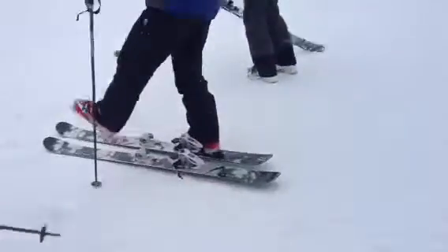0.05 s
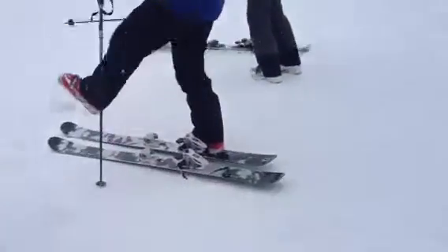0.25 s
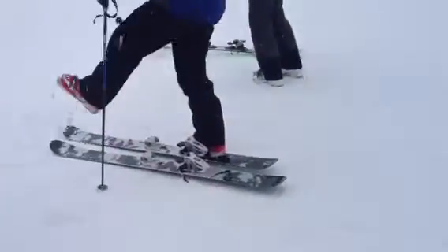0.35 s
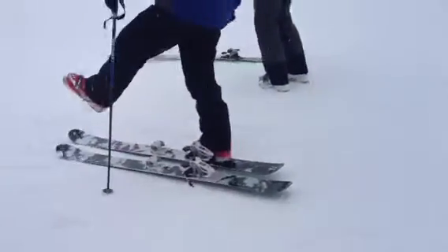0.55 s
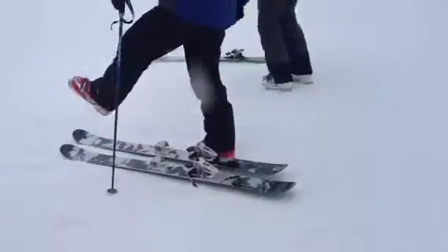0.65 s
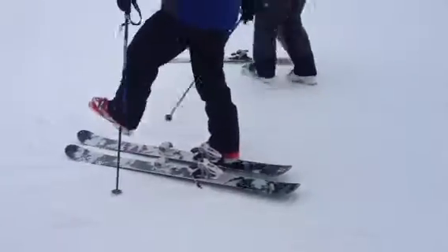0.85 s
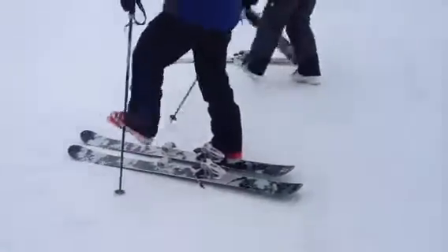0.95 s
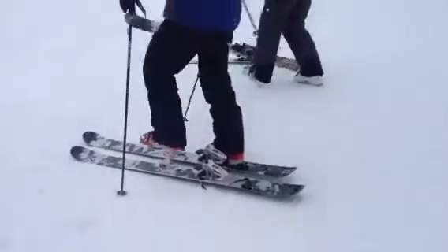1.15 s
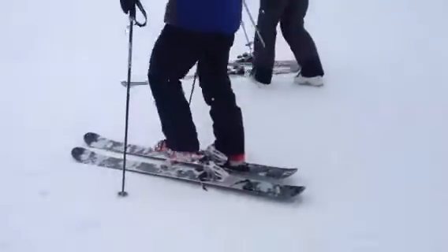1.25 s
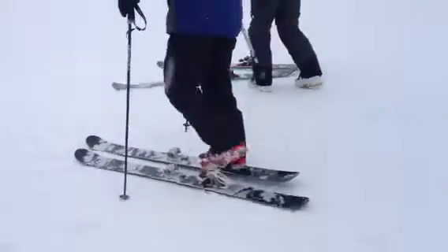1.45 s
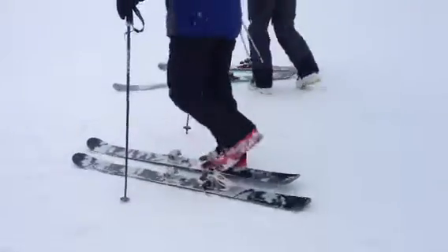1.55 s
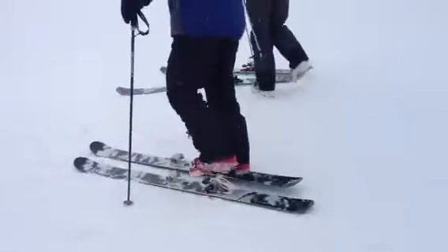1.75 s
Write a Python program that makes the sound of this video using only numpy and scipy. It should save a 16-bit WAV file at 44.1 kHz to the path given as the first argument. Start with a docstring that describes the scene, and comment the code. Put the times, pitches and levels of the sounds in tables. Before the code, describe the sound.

A pole cracks sharply against a plastic ski boot at 0.2 seconds, after a faint ski hiss; buckles rattle briefly and loosened snow thuds down and trickles. A second, more damped knock comes at 0.6 seconds. The pole tip crunches softly into snow near 1 second. The boot thumps onto the ski at 1.3 seconds and scuffs grittily over the binding until 1.7. A faint outdoor rumble lies underneath.

```python
"""A ski hisses over powder on a snowy slope. A skier knocks the shell of a raised plastic boot with
a pole: a crack, a short ring, chattering buckles. Loosened snow thuds down and trickles in crumbs.
A second, more damped knock lands on the sole, and the pole tip digs into packed snow. The boot comes
down on the ski with a thump, then scuffs over the binding, icy grit exciting their resonances.
A faint outdoor rumble and a low hum lie under it all."""
import sys
import numpy as np
from scipy import signal
from scipy.fft import rfft, irfft
from scipy.io import wavfile

SR = 44100
rng = np.random.default_rng(int(sys.argv[2]) if len(sys.argv) > 2 else 0)


def materialize(psi):
    """Save the field psi as 16-bit PCM at rate SR to the path in sys.argv[1].

    A 1-D psi becomes a single channel; in a 2-D psi each row is a channel.
    """
    bounded = np.clip(np.atleast_2d(psi).T, -1, 1)
    quanta = np.round(bounded * 32767).astype(np.int16)
    wavfile.write(sys.argv[1], SR, quanta)


N = 79380
TIME = np.arange(N) / SR

# ring of the plastic shell and of the more damped sole: f/Hz, relative level/dB, t60/s
SHELL_MODES = [(598, -15, 0.047), (783, -22.5, 0.042), (1283, -20.5, 0.029), (1513, -22.5, 0.044),
               (1620, -22.5, 0.0233), (1950, -31, 0.023), (2490, -27, 0.023), (3260, -9, 0.018),
               (4100, -27, 0.024), (4790, -19, 0.023), (6860, -18.5, 0.025), (8560, -13.5, 0.01),
               (11100, -18, 0.011), (12240, -15.5, 0.0071)]
SOLE_MODES = [(677, -6.5, 0.017), (816, -8, 0.014), (1350, -15.5, 0.012), (1980, -23.5, 0.019),
              (3670, -24.5, 0.014), (6200, -14, 0.0048), (6930, -17, 0.013), (8660, -19, 0.004),
              (10500, -26.5, 0.0066), (12900, -19, 0.0023)]
SHELL_AT_S, SOLE_AT_S, SOLE_GAIN_DB = .2081, .565, 2
# crack of each pole hit: t/s, level/dB, t60/s
CRACKS = [(0.2077, -14.5, 0.026), (0.566, -21, 0.017)]
# buckle chatter just after each hit: t/s, gain/dB, pitch factor
CHATTERS = [(0.218, -28, .95), (.2235, -34, 1.4), (0.5715, -26, 1.0), (0.5741, -34, 0.516),
            (0.577, -37, 1.5)]
CHATTER_GRIT_DB, CHATTER_T60_S = -3.5, 0.024
# ring of a buckle: f/Hz, relative level/dB, t60/s
BUCKLE_MODES = [(2350, -4.5, .02), (4230, -0.5, 0.013), (4640, 0.5, 0.017), (7600, -12, 0.011)]
# soft landings of snow and boot: t/s, gain/dB, pitch factor, contact time/s
THUMPS = [(0.282, -13.5, 0.888, .0012), (0.2919, -23.5, 0.936, 0.00073), (.806, -35.5, 0.99, .0016),
          (0.821, -34.5, 0.91, 0.00073), (1.341, -12.5, 1.012, .0011), (1.355, -24, 1.01, 0.00042),
          (1.577, -36, 0.853, 0.00095)]
# ring of the ski lying on snow: f/Hz, relative level/dB, t60/s
SKI_MODES = [(154, -12, 0.076), (219, -3.5, .04), (288.6, -0.5, 0.041), (363.5, -6, 0.038),
             (664, -8, 0.038), (900, -13.5, 0.027), (1240, -27, 0.043)]
# resonances of boot and binding: f/Hz, bandwidth/Hz, gain/dB
BINDING_RESONANCES = [(679, 65, 8.5), (1370, 55, -2), (2150, 260, -1.5), (4210, 240, 2.5)]

# bursts of sole scuffing, snow crunching and pole tip digging: t/s, level/dB, attack/s, t60/s
SCUFFS = [(1.408, -39.5, 0.0034, 0.054), (1.5015, -32.5, 0.0011, 0.039), (1.5167, -28, 0.0016, 0.062),
          (1.538, -42.5, 0.00034, 0.11), (1.564, -43.5, 0.013, 0.053), (1.608, -46.5, .001, 0.023),
          (1.659, -52, .001, .03)]
CRUNCHES = [(.22, -48.5, .005, 0.4), (.58, -51, .004, 0.25), (.284, -32, 0.0038, 0.071),
            (.3, -47.5, 0.046, 0.23), (.86, -60, 0.025, 0.16), (1.341, -37, 0.0029, 0.22),
            (1.359, -42, 0.0064, 0.096), (1.515, -53, 0.003, 0.12)]
DIGS = [(.975, -43.5, 0.0016, 0.17), (.997, -52.5, .012, 0.05), (1.045, -55.5, 0.011, 0.11)]
GRAINS_PER_S, CRUMBS_PER_S, GRAIN_SPREAD_DB = 7700, 800, 3.5
# fader curves of the sliding ski, falling crumbs and outdoor rumble: t/s, level/dB
SLIDE_FADER = [(0, -46.5), (.085, -45.5), (.13, -64), (.2, -71), (.45, -64), (.55, -65), (.7, -71),
               (1.3, -66), (1.6, -63), (1.8, -75)]
CRUMB_FADER = [(0, -102), (.23, -51), (.35, -48), (.45, -59), (.62, -58.5), (.75, -70.5), (.9, -59.5),
               (1.05, -57.5), (1.25, -71), (1.45, -51.5), (1.65, -65), (1.8, -79)]
RUMBLE_FADER = [(0, -45.5), (.15, -47.5), (.4, -48), (.55, -49), (.62, -57.5), (.69, -54), (.77, -55),
                (.92, -53.5), (1.1, -54), (1.24, -52), (1.45, -50.5), (1.6, -49), (1.8, -50.5)]
HUM_HZ, HUM_DB = 79.9, -64.5

# tone colour of each noise layer: f/Hz, relative level/dB
CRACK_COLOUR = [(100, -6), (350, 2), (1000, -0.5), (2200, 2.5), (5500, -1.5), (8500, 1.5), (12500, -14),
                (15500, -9)]
SCUFF_COLOUR = [(150, -2), (450, 3.5), (660, 1.5), (1000, -0.5), (2200, -3), (5000, -6), (7500, -5),
                (10000, -13.5), (15000, -17.5)]
SNOW_COLOUR = [(300, 6), (700, 5.5), (1100, 4), (1900, 0), (4500, 0.5), (7500, -1), (10000, -6),
               (15000, -11)]
DIG_COLOUR = [(900, -7), (1700, 7.5), (2600, -1), (3800, 5.5), (5500, -5.5), (8000, -1.5), (10000, -12),
              (15000, -12)]
SLIDE_COLOUR = [(500, -5), (2000, -3.5), (4500, 0), (7500, 7.5), (10000, 5.5), (15500, 0.5)]
RUMBLE_COLOUR = [(30, -22), (55, -53), (80, -14), (115, -12), (160, 1), (220, -2.5), (270, -3), (350, -5.5),
                 (445, -12.5), (580, -7.5), (760, -6), (1050, -17), (1500, -16), (2700, -21), (7500, -27),
                 (10000, -33), (15000, -33)]
BOOT_LOW_CUT_HZ, FOREGROUND_LOW_CUT_HZ, HIGH_CUT_HZ = 610, 91, 15500


def boot_knocks():
    """The pole hits shell, then sole: each gives a crack, a short ring and chattering buckles."""
    shell = struck(SHELL_AT_S, SHELL_MODES)
    sole = from_db(SOLE_GAIN_DB) * struck(SOLE_AT_S, SOLE_MODES)
    ring = low_cut(shell + sole, BOOT_LOW_CUT_HZ, order=2)  # the ring keeps little bass
    buckles = sum(from_db(db) * struck(start, BUCKLE_MODES, pitch) for start, db, pitch in CHATTERS)
    crack_envelope = sum(from_db(db) * decay(start, t60) for start, db, t60 in CRACKS)
    grit_envelope = sum(from_db(db + CHATTER_GRIT_DB) * decay(start, CHATTER_T60_S)
                        for start, db, _ in CHATTERS)
    noise = coloured(rng.standard_normal(N), CRACK_COLOUR)
    return ring + buckles + (crack_envelope + grit_envelope) * noise


def ski_thumps():
    """Snow and boot land on the snow-damped ski; the longer the contact, the duller the thump."""
    thumps = np.zeros(N)
    for start, db, pitch, contact_s in THUMPS:
        push = np.sin(np.pi * np.minimum(TIME / contact_s, 1)) ** 2
        ring = struck(start, SKI_MODES, pitch)
        thumps += from_db(db) * signal.fftconvolve(ring, push / push.sum())[:N]
    return thumps


def binding_scuffs():
    """Icy grit between sole and binding excites their resonances."""
    grit = bursts(SCUFFS) * grains(SCUFF_COLOUR, GRAINS_PER_S)
    body = sum(from_db(db) * signal.lfilter(*signal.iirpeak(hz, hz / width, fs=SR), grit)
               for hz, width, db in BINDING_RESONANCES)
    return grit + body


def snow():
    """Snow crunches under landings and the pole tip, hisses under a sliding ski and falls in crumbs."""
    crunch = bursts(CRUNCHES) * grains(SNOW_COLOUR, GRAINS_PER_S)
    dig = bursts(DIGS) * grains(DIG_COLOUR, GRAINS_PER_S)
    slide = fader(SLIDE_FADER) * grains(SLIDE_COLOUR, GRAINS_PER_S)
    crumbs = fader(CRUMB_FADER) * grains(SNOW_COLOUR, CRUMBS_PER_S)
    return crunch + dig + slide + crumbs


def outdoor_bed():
    """Distant rumble of the slope and a steady low hum."""
    rumble = fader(RUMBLE_FADER) * coloured(rng.standard_normal(N), RUMBLE_COLOUR)
    hum = from_db(HUM_DB) * unit_rms(np.sin(2 * np.pi * HUM_HZ * TIME))
    return rumble + hum


def struck(start, modes, pitch=1):
    """Damped modes of alternating sign, set off by one blow."""
    ring = np.zeros(N)
    for k, (hz, db, t60) in enumerate(modes):
        tone = np.sin(2 * np.pi * hz * pitch * (TIME - start))
        ring += (-1) ** k * from_db(db) * decay(start, t60) * tone
    return ring


def grains(colour, per_s):
    """Snow crystals fracture at random moments, in tiny clicks of uneven size."""
    sizes = from_db(GRAIN_SPREAD_DB * np.minimum(rng.exponential(1, N), 4))
    signs = rng.choice([-1, 1], N)
    fractures = rng.random(N) < per_s / SR
    return coloured(sizes * signs * fractures, colour)


def bursts(rows):
    """Envelope of bursts, each with a linear attack and an exponential tail."""
    envelope = np.zeros(N)
    for start, db, attack, t60 in rows:
        rise = np.clip((TIME - start) / attack, 0, 1)
        tail = from_db(-60 * np.maximum(TIME - start - attack, 0) / t60)
        envelope += from_db(db) * rise * tail
    return envelope


def decay(start, t60):
    """Envelope with an instant attack, falling 60 dB in t60 seconds."""
    return (TIME >= start) * from_db(-60 * np.maximum(TIME - start, 0) / t60)


def fader(points):
    """Ride the gain through points of t/s, level/dB."""
    return from_db(np.interp(TIME, *np.transpose(points)))


def coloured(noise, colour):
    """EQ a noise to a tone colour, at unit rms."""
    hz, db = np.transpose(colour)
    bin_hz = np.maximum(np.arange(N // 2 + 1) * SR / N, 1)
    eq = from_db(np.interp(np.log(bin_hz), np.log(hz), db))
    return unit_rms(irfft(rfft(noise) * eq, N))


def low_cut(x, hz, order):
    """Roll off the bass."""
    return signal.sosfilt(signal.butter(order, hz, "high", fs=SR, output="sos"), x)


def from_db(db):
    """Decibels to gain."""
    return 10 ** (np.asarray(db) / 20)


def unit_rms(x):
    """Scale to an rms of 1."""
    return x / np.sqrt(np.mean(x ** 2) + 1e-20)


def scene():
    """Boot, ski and snow over the outdoor bed, in mono and dry as open air."""
    foreground = boot_knocks() + ski_thumps() + snow() + binding_scuffs()
    return (low_cut(foreground, FOREGROUND_LOW_CUT_HZ, order=3) + outdoor_bed())[None]


def record(dry):
    """A steep high cut takes off the very top."""
    return signal.sosfilt(signal.ellip(10, .1, 80, HIGH_CUT_HZ, fs=SR, output="sos"), dry)


dry = scene()
out = record(dry)
materialize(out)
```